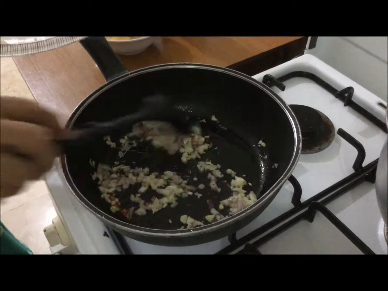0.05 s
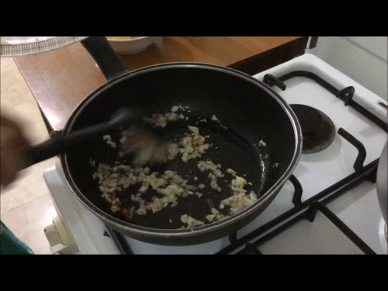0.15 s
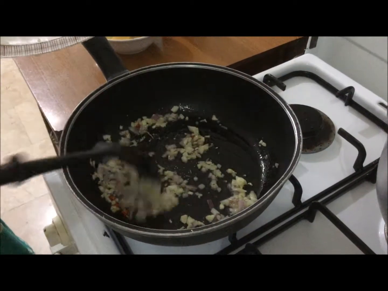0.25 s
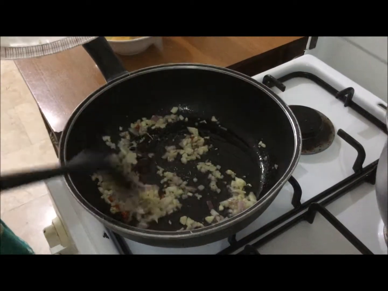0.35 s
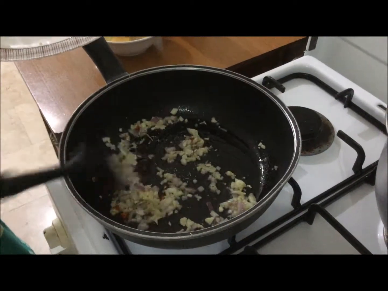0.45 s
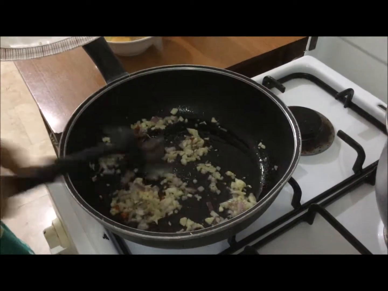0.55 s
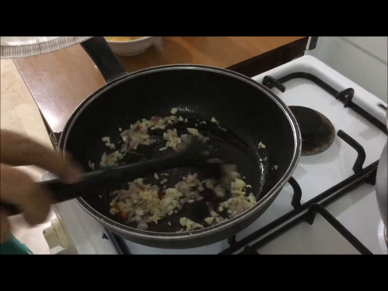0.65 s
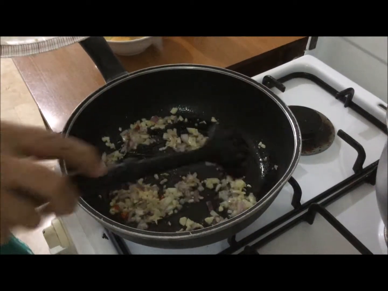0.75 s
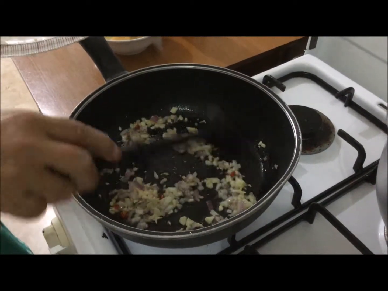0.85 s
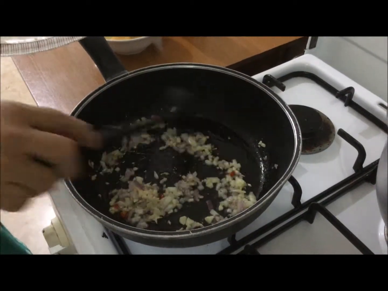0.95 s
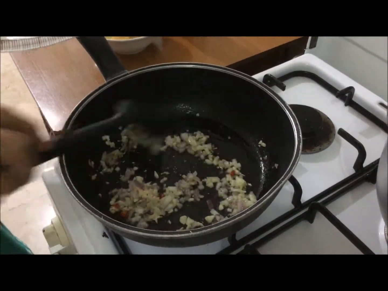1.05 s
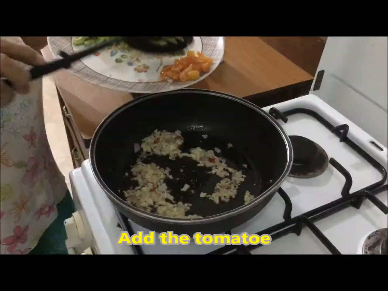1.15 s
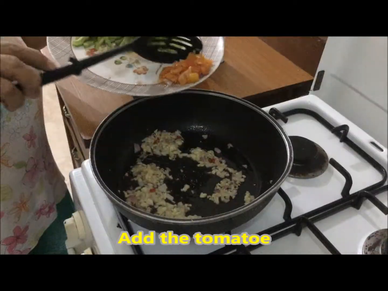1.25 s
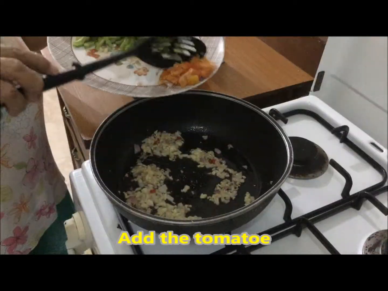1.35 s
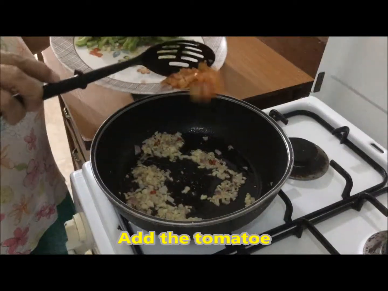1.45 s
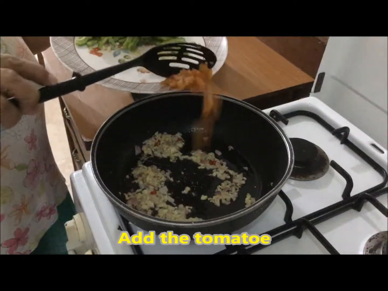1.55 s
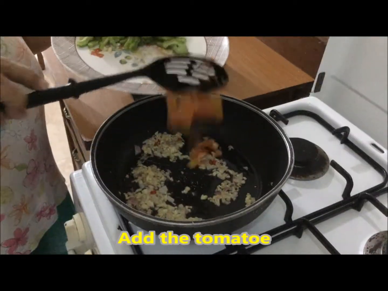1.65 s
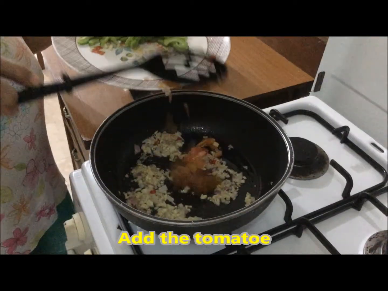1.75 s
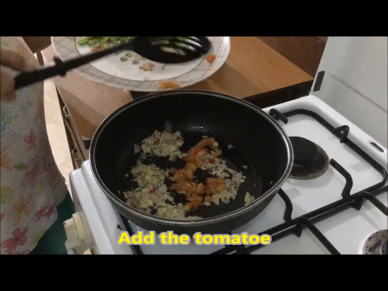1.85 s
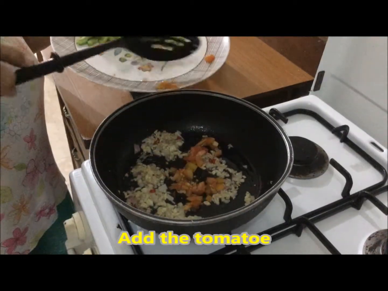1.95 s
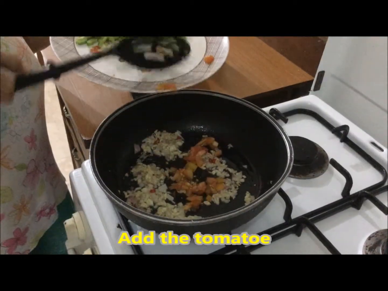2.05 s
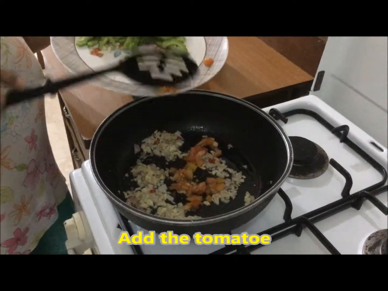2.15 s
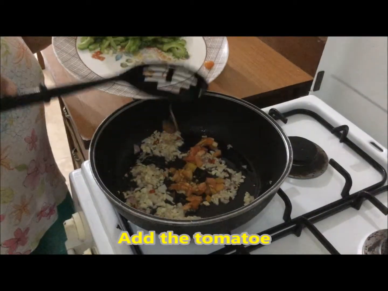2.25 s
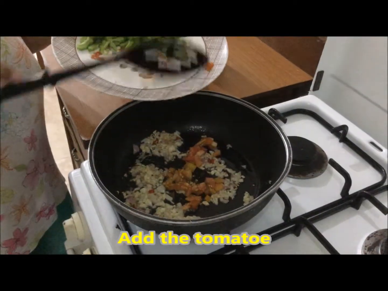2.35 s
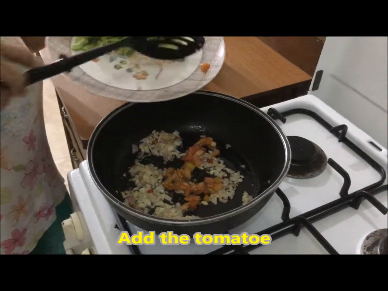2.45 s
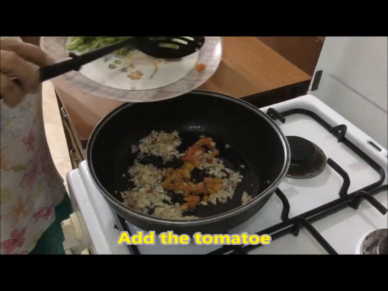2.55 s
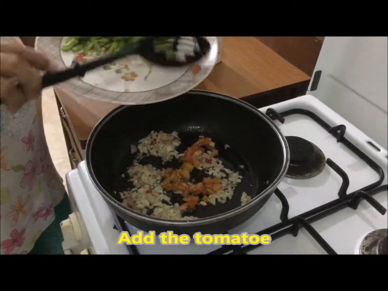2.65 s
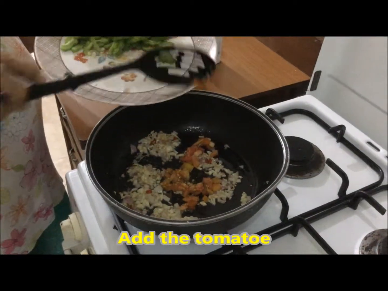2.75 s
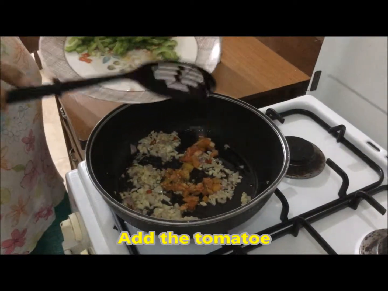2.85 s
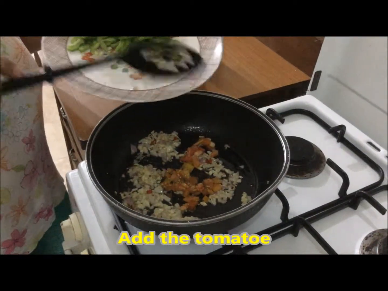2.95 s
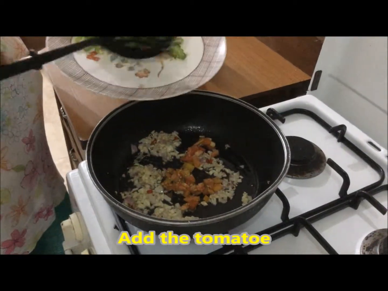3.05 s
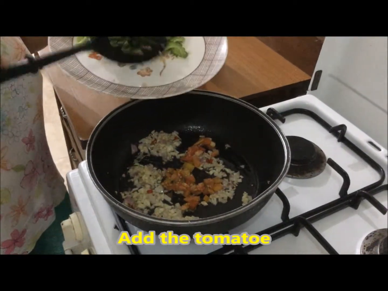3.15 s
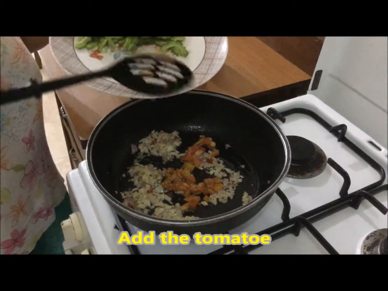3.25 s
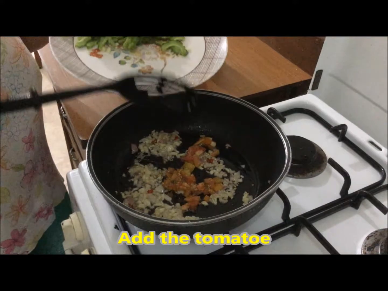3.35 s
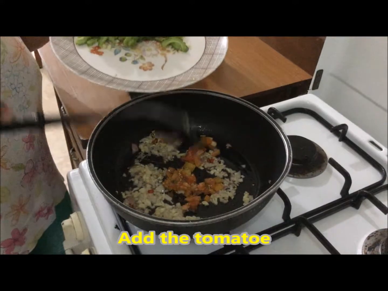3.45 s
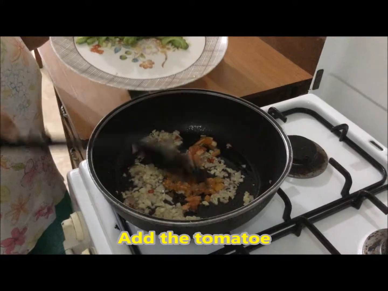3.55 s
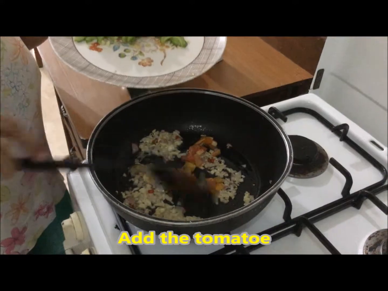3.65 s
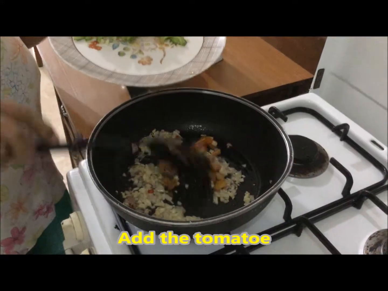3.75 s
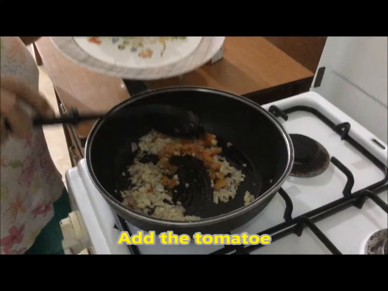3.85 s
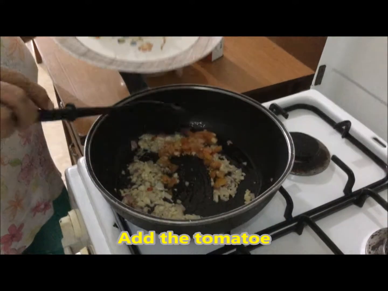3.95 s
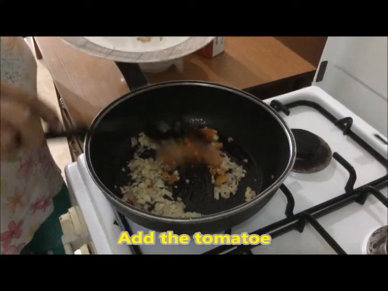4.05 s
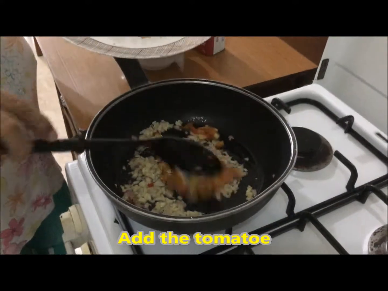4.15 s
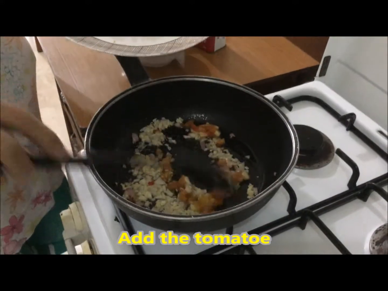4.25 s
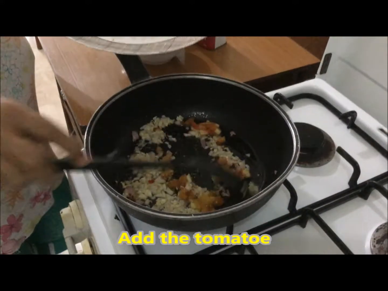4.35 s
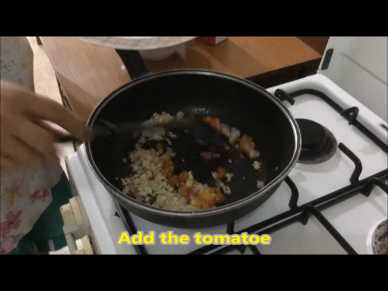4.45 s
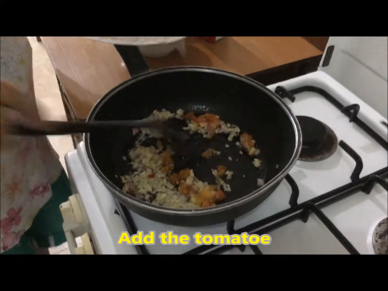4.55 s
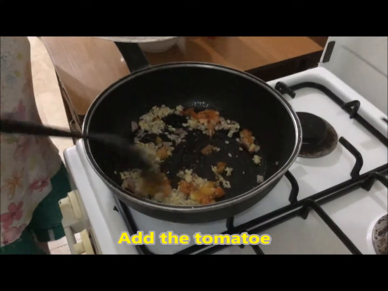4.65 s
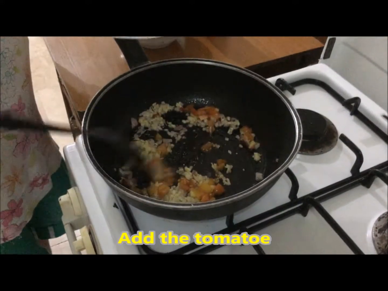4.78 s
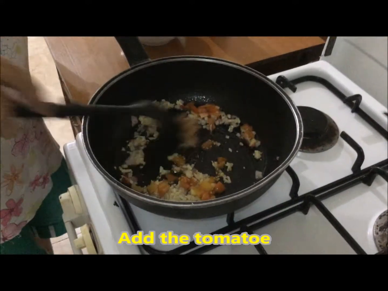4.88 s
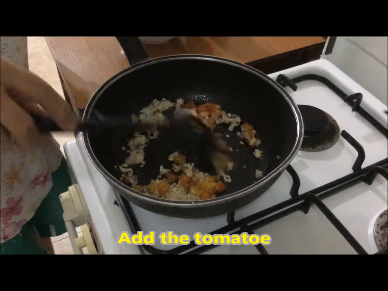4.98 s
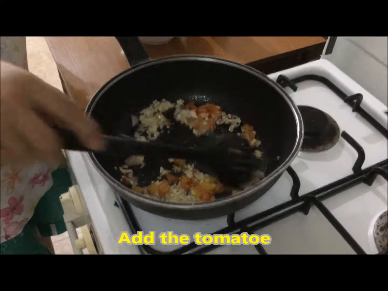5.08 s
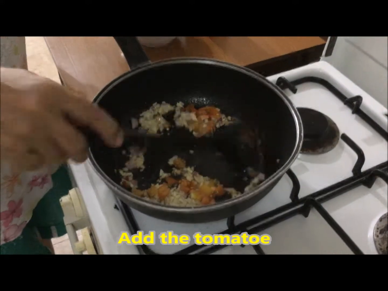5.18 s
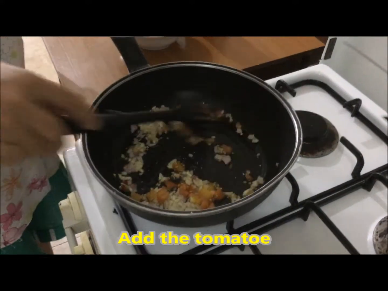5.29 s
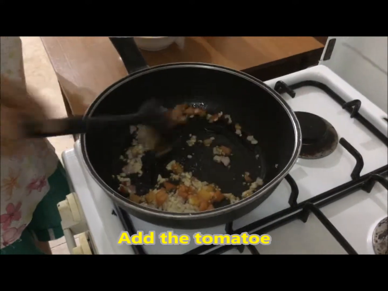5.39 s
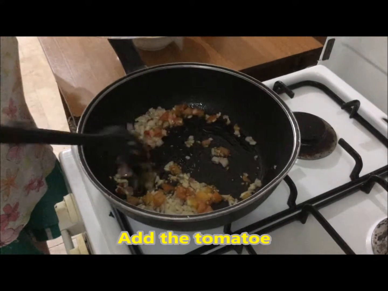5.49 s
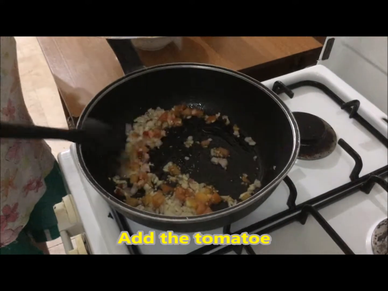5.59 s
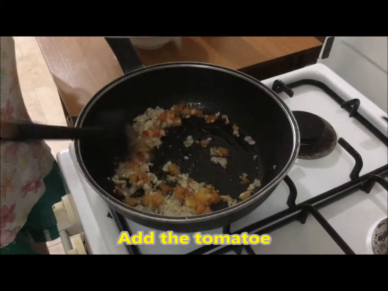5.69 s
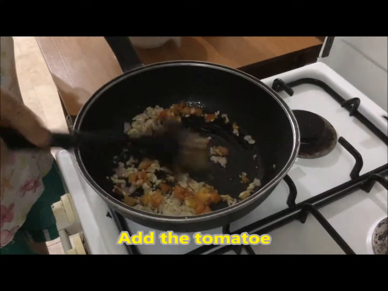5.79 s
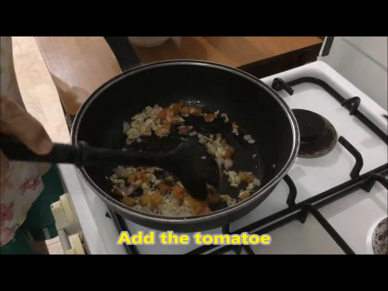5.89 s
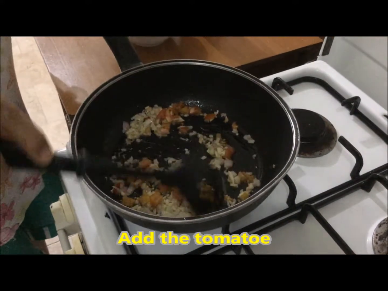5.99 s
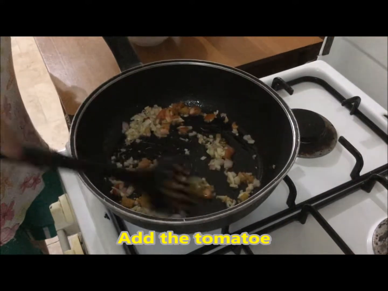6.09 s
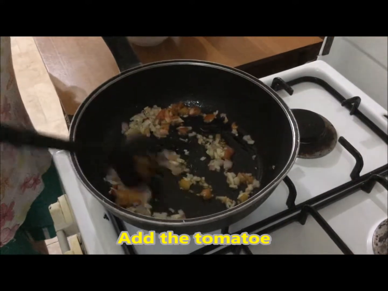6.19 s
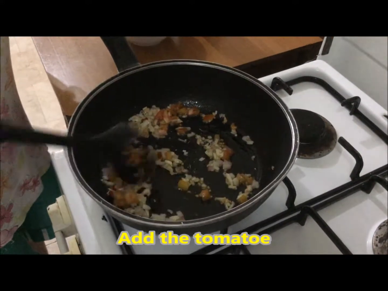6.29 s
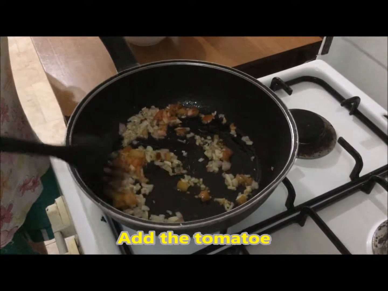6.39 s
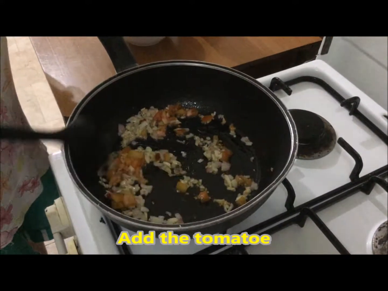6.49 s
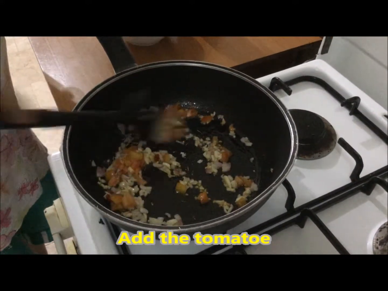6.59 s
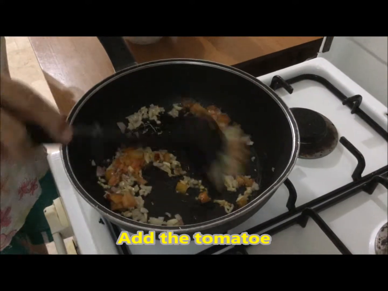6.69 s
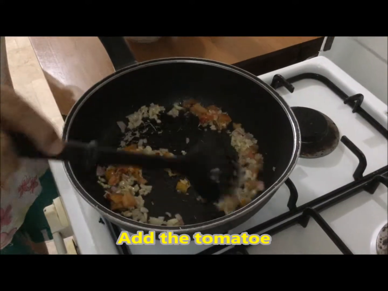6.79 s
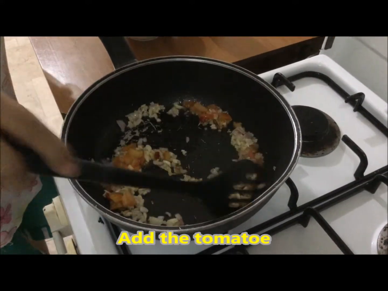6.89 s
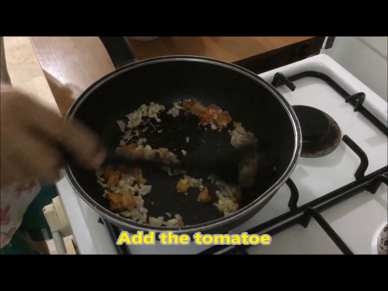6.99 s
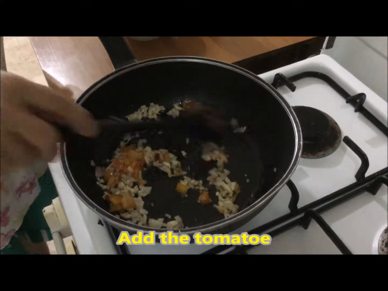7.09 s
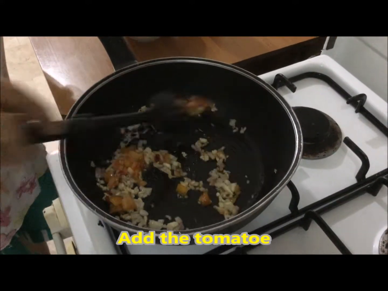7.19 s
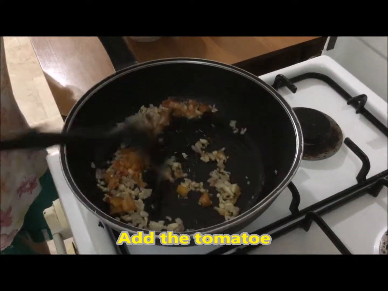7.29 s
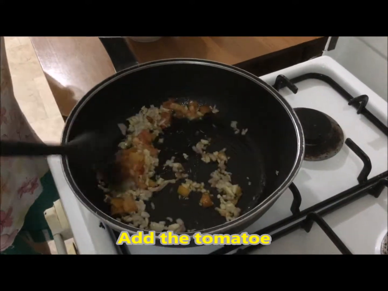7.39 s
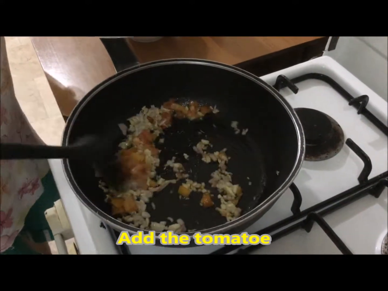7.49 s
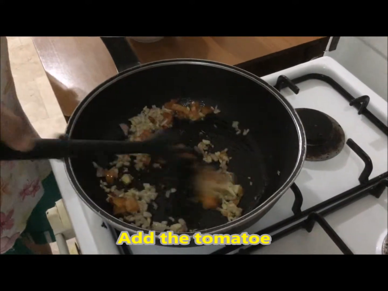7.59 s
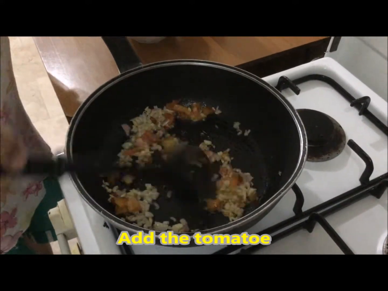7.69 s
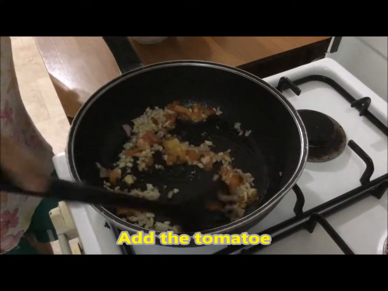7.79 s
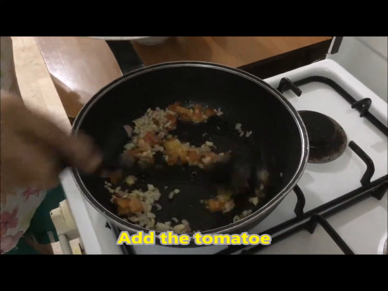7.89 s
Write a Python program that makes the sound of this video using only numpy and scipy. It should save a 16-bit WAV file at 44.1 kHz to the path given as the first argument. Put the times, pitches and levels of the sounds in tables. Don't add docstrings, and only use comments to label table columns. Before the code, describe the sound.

A close pan fry crackles brightly, cuts to a softer hiss, then grows juicier and louder with spoon scrapes, knocks and spitting drops.

```python
import sys
import numpy as np
from scipy import signal
from scipy.fft import rfft, irfft, next_fast_len
from scipy.io import wavfile
from scipy.ndimage import uniform_filter1d

SR = 44100
rng = np.random.default_rng(int(sys.argv[2]) if len(sys.argv) > 2 else 0)


def ratio_of_db(decibels):
    return 10 ** (np.asarray(decibels, float) / 20)


def store_pcm(level_fs):
    pcm = np.round(np.clip(level_fs, -1, 1) * 32767).astype(np.int16)
    wavfile.write(sys.argv[1], SR, np.atleast_2d(pcm).T)


N = 349713

# t/s, frying vigour level/dB, juice bubbling re vigour level/dB
FRY_STATES = [
    [(0.0, -39, -19.5), (0.958, -41, -19.5), (1.144, -42, -19.5)],
    [(1.184, -54, -14), (1.66, -53, -18), (1.83, -46.5, -20.5), (2.0, -43.5, -11), (2.6, -42.5, -9.5),
     (3.3, -40, -11), (3.9, -39, -12.5), (4.08, -35, -13), (4.5, -36.5, -12), (4.75, -33.5, -13.5),
     (5.1, -34.5, -12), (5.6, -34, -12.5), (6.6, -34, -12.5), (6.9, -31, -15), (7.93, -34, -14)],
]
# t/s, peak level/dB, low part level/dB
BIG_POPS = [(0.1231, -27, -33), (0.343, -19, -46), (0.4028, -22, -24), (0.3715, -26, -33),
            (0.6319, -22, -20), (0.8088, -21, -40), (1.6834, -29.5, -35), (1.7253, -38, -33),
            (2.0556, -27, -33), (2.1334, -33, -33), (2.2294, -32, -33), (2.2676, -29, -10),
            (2.9605, -30, -36), (3.219, -21, -28), (3.396, -22.5, -48), (3.4439, -29, -40),
            (3.5385, -26, -30), (3.6248, -28, -33), (3.6372, -26, -43), (3.6768, -29, -33),
            (3.7955, -24, -33), (3.89, -23, -34), (4.0898, -21, -36), (4.1076, -26, -40),
            (4.3154, -30, -22), (4.5725, -22, -24), (4.6818, -16, -27), (4.7675, -15.5, -30),
            (4.9038, -24, -35), (4.9735, -21, -28), (5.0408, -25, -36), (5.7922, -21, -42),
            (6.0886, -23, -36), (6.3782, -16.5, -20), (6.6039, -23, -33), (7.236, -20, -35),
            (7.2884, -22, -33), (7.5874, -19, -49), (7.8958, -20, -40)]
# t/s, peak level/dB, low part level/dB
SMALL_POPS = [(0.42, -32, -37), (0.483, -28, -28), (0.5004, -24, -24), (0.5112, -27, -38),
              (0.526, -23, -33), (0.608, -26, -33), (0.7474, -28.5, -21), (0.9567, -35, -32),
              (1.1185, -29, -32), (1.2841, -31, -31), (1.84, -36, -29), (1.8803, -32.5, -9),
              (1.9163, -36, -28), (1.9407, -35, -9), (1.9995, -33, -29), (2.0951, -32, -34),
              (2.4552, -26, -36), (2.4744, -28, -24), (2.4868, -35, -24), (2.5665, -31, -16),
              (2.6505, -46, -29), (2.7415, -30, -24), (2.7602, -35, -31), (2.8288, -30, -24),
              (2.8709, -28.5, -13), (2.8789, -37, -28), (2.937, -27, -26), (3.0012, -25, -34),
              (3.0527, -28, -27), (3.112, -38, -27), (3.1785, -26, -32), (3.2009, -27, -25),
              (3.232, -36, -31), (3.2715, -25, -16), (3.2804, -27, -38), (3.38, -33, -34),
              (3.4509, -25, -22), (3.55, -24, -27), (3.5569, -32, -35), (3.6506, -34, -34),
              (3.691, -25, -28), (3.732, -39, -28), (3.8423, -30, -32), (3.9917, -25, -21),
              (4.016, -22, -30), (4.0729, -28, -30), (4.102, -25, -38), (4.207, -24, -34),
              (4.4407, -20, -19), (4.5459, -35, -33), (4.6415, -30, -28), (4.8568, -27, -24),
              (5.0514, -31, -32), (5.9443, -27, -31), (6.1137, -25, -32), (6.4125, -27, -30),
              (7.047, -30, -29), (7.3293, -18, -23), (7.7025, -23, -38), (7.711, -24, -33)]
# t/s, peak level/dB, loudest
# mode f/Hz, thud level/dB
SPOON_KNOCKS = [(0.5098, -30, 950, -9), (0.749, -40, 1450, -11), (0.8968, -33.5, 873, -7),
                (0.8965, -38, 507, -6), (0.931, -48, 810, 1), (1.055, -41.5, 900, 6),
                (1.0963, -41, 1490, 11), (1.863, -46, 1030, -11), (1.278, -34.5, 796, -10),
                (2.114, -25, 1446, -7), (2.723, -28.5, 1530, -16), (2.968, -32, 1490, -24),
                (3.193, -24.5, 1380, -5), (3.747, -24.5, 2200, -10), (4.398, -23.5, 620, -23),
                (4.413, -25.5, 1060, 0.5), (4.822, -30.5, 740, -3), (5.728, -32, 1380, -5.5),
                (5.995, -46, 1480, 5), (6.483, -26.5, 1350, -4), (6.582, -30, 1430, -22),
                (7.101, -27.5, 594, -17), (7.118, -30, 1120, -9), (7.566, -47, 1350, 13)]
# t/s, peak level/dB, f/Hz
FLOOR_THUMPS = [(0.34, -49, 218), (0.507, -44, 171), (0.591, -45, 280), (0.634, -43, 310),
                (0.689, -49, 298), (0.896, -39, 240), (0.932, -34, 205), (0.93, -42, 101.6),
                (0.99, -41, 213), (1.058, -39, 232), (1.091, -44, 221), (1.183, -37.5, 298),
                (1.183, -48, 470), (1.274, -48, 302), (1.85, -41, 170), (1.9, -39.5, 190),
                (2.489, -46.5, 161), (3.1, -48, 192), (3.191, -49, 302), (3.75, -49, 260),
                (3.791, -38.5, 192), (4.412, -39, 300), (4.687, -48, 177), (4.83, -46, 310),
                (5.737, -43, 223), (5.999, -46.5, 400), (6.492, -34.5, 302), (6.582, -41, 246),
                (7.101, -41.5, 402), (7.568, -35.5, 230)]
# start t/s, length t/s, scrape level/dB, grate shake level/dB
SPOON_STROKES = [(0.0, 0.19, -58, -57), (0.568, 0.056, -54.5, -77), (0.897, 0.17, -53, -73),
                 (1.185, 0.15, -57, -71), (1.69, 0.39, -64.5, -58), (2.103, 0.086, -64, -68),
                 (2.498, 0.32, -63.5, -58), (2.897, 0.099, -67, -56), (3.19, 0.082, -56.5, -68),
                 (3.768, 0.085, -55.5, -50), (4.396, 0.061, -50, -50), (4.82, 0.093, -48, -52.5),
                 (5.236, 0.12, -58, -69), (5.742, 0.093, -54, -54), (6.103, 0.055, -50.5, -59),
                 (6.46, 0.18, -51.5, -63), (6.72, 0.046, -53.5, -56), (7.077, 0.15, -56.5, -57),
                 (7.542, 0.094, -51, -49.5), (7.872, .1, -52, -47)]
# t/s, peak level/dB, f/Hz
JUICE_SPITS = [(0.341, -52, 2410), (0.3406, -57, 1500), (0.7477, -45, 3200), (0.4503, -39, 2300),
               (1.892, -37, 3000), (1.1817, -58, 1750), (1.2763, -29, 1860), (1.2766, -29, 2740),
               (1.277, -40, 3540), (2.077, -33, 1430), (2.1032, -31, 1700), (2.1157, -22, 1380),
               (2.348, -25.5, 1390), (2.5294, -30, 1350), (2.9695, -23.5, 1530), (3.1958, -34, 1380),
               (3.732, -34, 1880), (3.748, -40, 2150), (4.352, -22, 1600), (4.7517, -26, 1280),
               (6.0884, -28, 1680), (6.221, -21, 1490), (6.3091, -23, 1350), (6.525, -29, 1980),
               (6.6167, -24, 1400), (7.809, -31, 1350)]
# t/s, peak level/dB, f/Hz
JUICE_DROPS = [(0.0193, -43, 1390), (0.0323, -45, 2000), (0.1282, -40, 1420), (0.1405, -35, 1600),
               (0.152, -35, 2500), (0.2331, -39, 1410), (0.2548, -44, 2510), (0.371, -50, 1320),
               (0.4285, -54, 2550), (1.094, -43, 1310), (1.295, -38, 1860), (1.8794, -44, 1840),
               (1.888, -37, 2470), (1.8984, -39, 1370), (1.975, -42, 1380), (2.031, -36, 1312),
               (2.0447, -33, 1440), (2.2328, -35, 1180), (2.2492, -36, 1390), (2.267, -43, 1320),
               (2.383, -36, 1440), (2.4513, -33, 1560), (2.64, -28.5, 1410), (2.722, -41, 1520),
               (3.2187, -27, 1370), (3.2686, -29, 1320), (3.488, -33, 1340), (3.517, -32, 1320),
               (3.5333, -35, 1330), (3.546, -27.5, 1270), (3.6779, -32, 1480), (3.6854, -31, 1570),
               (3.759, -27.5, 1950), (3.812, -35, 1340), (3.98, -31, 1720), (4.01, -27, 1570),
               (4.1593, -39, 1350), (4.24, -28, 1880), (4.3199, -33, 1360), (4.5672, -24.5, 1510),
               (4.8555, -27, 1700), (4.946, -34, 1570), (4.995, -37, 1650), (5.125, -42, 1500),
               (5.296, -28, 1360), (5.505, -33, 1320), (5.6364, -36, 1520), (5.6719, -39, 1350),
               (5.8847, -31, 1390), (5.9517, -23, 1550), (6.3684, -41, 1430), (6.82, -45, 1300),
               (7.119, -27, 2020), (7.2578, -24, 1450), (7.3847, -32, 1290), (7.6944, -31, 1450),
               (7.7325, -30, 1330), (7.8982, -29, 1530)]
# t/s, peak level/dB, f/Hz
SLOW_PLOPS = [(1.0542, -46, 565), (2.0307, -45, 660), (2.2324, -47, 665), (2.726, -51, 800),
              (2.938, -42, 640), (3.0472, -36, 726), (3.2107, -28, 840), (4.2142, -48, 640),
              (4.4336, -34, 600), (4.6595, -34, 610), (5.1795, -35, 656), (5.2144, -35, 684),
              (5.5639, -40, 620), (5.726, -33.5, 614), (6.0145, -32.5, 665), (6.1109, -36, 830),
              (6.907, -39, 760), (7.1266, -34, 584), (7.2352, -37, 700), (7.4198, -33.5, 650)]
# t/s, peak level/dB
FAT_SNAPS = [(0.2565, -38), (0.4295, -29), (0.5173, -38), (0.7489, -31), (1.0958, -35), (1.2766, -36),
             (1.2778, -35), (1.8894, -37), (1.9383, -40), (2.0816, -38), (2.2504, -35), (2.2692, -34),
             (0.6329, -34), (2.3346, -39), (2.5304, -36), (2.8595, -37), (2.9424, -39), (3.4961, -33),
             (3.814, -34), (3.8421, -30), (4.1593, -31), (4.6593, -30), (5.0893, -29), (6.0356, -33),
             (6.4139, -32)]
# t/s, level/dB
STREET_SWELL = [
    (0, -5.5),
    (1.15, -4.5),
    (1.2, 0.5),
    (2.4, 0),
    (3.5, -2),
    (3.8, -1.5),
    (7.93, 0.5),
]
# t/s, fully lost t/ms, all lost below f/Hz, spared lines f/Hz ...
LOST_FRAMES = [(0.089, 0.38, 11200, 120, 11000), (0.3175, 29, 9100, 5120, 9000),
               (0.729, 0.4, 11400, 4300, 10340), (0.923, 0.37, 13150, 835, 5690),
               (1.33, 0.2, 12290, 120, 12290), (1.673, 5, 13540, 1340, 1440, 5020),
               (1.797, 0.79, 10220, 119, 7560, 8490, 9810), (2.181, 2, 14400, 1230, 1970),
               (3.354, 2, 12700, 1430, 1840, 6110, 9390), (3.718, 0.81, 11400, 600, 4500, 6840, 7800),
               (3.78, 0.36, 13300, 1040, 1940, 3170, 7480),
               (4.505, 0.23, 13400, 120, 1276, 3130, 5875, 7135),
               (4.78, 4, 10200, 1370, 5650, 6380, 8870, 9765), (5.103, 0.5, 13300, 1354, 2130, 3720, 4740),
               (5.425, 0.35, 10700, 7950, 8270, 11300), (5.55, 0.23, 12200, 1290, 5420, 6740),
               (5.617, 0.49, 10800, 2945, 9310, 9700), (5.656, 0.37, 13600, 1370, 1950, 3130, 6320),
               (5.977, 0.6, 13000, 1320, 1980, 4190, 6350), (6.511, 0.22, 10300, 344, 10400),
               (6.553, 0.32, 10800, 1450, 8850), (6.703, 0.6, 11400, 1500, 2315, 8170),
               (7.64, 0.2, 12100, 120, 4490)]
# out t/s, in t/s, leftover level/dB, its fall in dB/s
SCENE_CHANGE = (1.1455, 1.1827, -19, -600)
# f/Hz, density level/dB per Hz
SIZZLE_SPECTRUM = [(1060, -37), (1800, -9.5), (2530, -13.5), (2790, -15.5), (3020, -11), (3550, -13),
                   (6240, -5.5), (7530, -4.5), (10200, -1), (13200, 2.5), (14300, 3), (15200, -8.5)]
# f/Hz, density level/dB per Hz
RUMBLE_SPECTRUM = [(13, -70), (22, -40), (70, -3.5), (113, -4.5), (145, -8.5), (200, -16.5), (260, -49),
                   (440, -120)]
# f/Hz, width f/Hz, level/dB
HOLLOW_MODES = [(1350, 303, 10.5), (1730, 225, 11.5), (1920, 1100, -5)]
# f/Hz, width f/Hz, level/dB
LOW_HOLLOW_MODES = [(598, 134, 5.5), (800, 990, -3.5)]
# f/Hz, width f/Hz, level/dB
FLOOR_MODES = [(173.3, 25.7, 6.5), (236, 22, 4), (310, 74, -1.5)]
# f/Hz, level/dB, t60 t/s
PAN_MODES = [(289, -6, 0.13), (500.4, -4.5, 0.021), (852, -9.5, 0.099), (1030, -11.5, 0.081),
             (1380, 3, 0.01), (2200, -19, 0.0076), (3400, -13, 0.013)]
# f/Hz, width f/Hz, level/dB
HUM_LINES = [(79, 5.7, 2.5), (117.8, 6.6, 1.5), (154.8, 3.5, -5), (171, 18, -40)]
# f/Hz, width f/Hz, level/dB
FRIDGE_WHINE = (474, 12, -76)

MIC_HZ, CUTOFF_HZ = 13300, 15290
WET_DB, MID_DB, MID_FOLLOWS = -11, -7.5, 0.37
LOW_SIMMER_DB, LOW_FOLLOWS = -4.5, 0.31
LOW_FLOOR_DB = -71.5
SURGE_DB, SURGE_PER_S = 0.25, 2.0
CRACKLES_PER_S, CRACKLE_DB = 60, -21.5
FULL_FRY_DB, LIVELY_DB = -36, -44
DIG_IN_S, LIFT_DB_PER_S, SHAKE_LAG_S = 0.012, 52, 0.04
IDLE_SCRAPE_DB, IDLE_FOLLOWS, ROOM_DB = -62.5, 0.54, -57
DROP_CYCLES = 15.0
POP_HZ, POP_SPREAD, DULL_HZ_PER_DB = 11870, 0.058, 30
SNAP_HZ, SNAP_T60_S = 3300, 0.0025
CRACK_DB, CRACK_T60_S = 5, 0.005
EARLY_S = 2
STEP_DB, BLIP_MS, EARLY_MS = 15, 46.0, 8.0


def unit(x):
    return x / np.sqrt(np.mean(x ** 2) + 1e-20)


def curves(spans):
    s, *columns = np.transpose(np.concatenate(spans))
    return [np.interp(np.arange(N) / SR, s, c) for c in columns]


def drift(rate_hz):
    r = np.exp(-40 * np.pi * rate_hz / SR)
    slow = signal.lfilter([1], [1, -2 * r, r * r], rng.standard_normal(N // 20 + 3002))[3000:]
    return np.interp(np.arange(N) / 20, np.arange(len(slow)), unit(slow))


def grains(per_s, spread_db, rarest=3):
    rarity = np.minimum(rng.exponential(1, N), rarest)
    sizes = ratio_of_db(spread_db * rarity) * rng.choice([-1, 1], N)
    return sizes * (rng.random(N) < per_s / SR) + 1e-18


def resonate(x, peaks):
    out = 0
    for k, (hz, width_hz, db) in enumerate(peaks):
        r = np.exp(-np.pi * width_hz / SR)
        a = [1, -2 * r * np.cos(2 * np.pi * hz / SR), r * r]
        out = out + (-1) ** k * ratio_of_db(db) * signal.lfilter([(1 - r * r) / 2, 0, (r * r - 1) / 2], a, x)
    return unit(out)


def tone(hz, t60_s, size=4000):
    t = np.arange(size) / SR
    return np.sin(2 * np.pi * hz * t) * ratio_of_db(-60 * t / t60_s)


def shape(x, spectrum):
    hz, db = np.transpose(spectrum)
    size = next_fast_len(N)
    log_hz = np.log(np.arange(size // 2 + 1) * SR / size + 1)
    gain = ratio_of_db(np.interp(log_hz, np.log(hz), db))
    return unit(irfft(rfft(x, size) * gain, size)[:N])


def patchy(sources, low_hz, high_hz, count, patch_db, shared_db):
    out, shared, edges = 0, drift(24.0), np.geomspace(low_hz, high_hz, count + 1)
    for k, (low, high) in enumerate(zip(edges, edges[1:])):
        sos = signal.butter(2, [low, high], "band", fs=SR, output="sos")
        band = signal.sosfilt(sos, sources[k % len(sources)])
        out = out + ratio_of_db(patch_db * drift(18.4) + shared_db * shared) * band
    return out


def sizzle(level_db, mid_db):
    bursts = grains(2600 * ratio_of_db(4.0 * drift(60.0)), spread_db=5.2)
    pitches_hz, dealt = np.geomspace(2200, 15000, 12), rng.integers(0, 12, N)
    rings = 0
    for k, hz in enumerate(pitches_hz):
        rings = rings + resonate(bursts * (dealt == k), [(hz, hz * 0.42, 0)]) * np.sqrt(hz)
    blur = patchy(rng.standard_normal((2, N)), 1022, 16650, count=13, patch_db=1.5, shared_db=1.18)
    fizz = shape(unit(rings) + ratio_of_db(4.5) * unit(blur), SIZZLE_SPECTRUM)
    mid = signal.sosfilt(signal.butter(2, 5000, fs=SR, output="sos"), fizz)
    mid_gain = ratio_of_db(mid_db + 14.0 + 1.64 * drift(7.9))
    return ratio_of_db(level_db - 0.51) * (fizz - mid + mid_gain * mid)


def simmer(high_db, low_db):
    quick = unit(grains(300 * ratio_of_db(2 * drift(12)), spread_db=4.5, rarest=1.8))
    quick = quick + ratio_of_db(-1) * rng.standard_normal(N)
    slow = unit(grains(300, spread_db=1.5)) + ratio_of_db(-4.5) * rng.standard_normal(N)
    broad = resonate(resonate(quick, [(1700, 2100, 0)]), [(1600, 2500, 0)])
    high = unit(resonate(quick, HOLLOW_MODES) + ratio_of_db(-7.0) * broad)
    return ratio_of_db(high_db + 1.0) * high + ratio_of_db(low_db - 2.5) * resonate(slow, LOW_HOLLOW_MODES)


def crackle(level_db):
    per_s = CRACKLES_PER_S * ratio_of_db(np.minimum(level_db - LIVELY_DB, 0))
    clicks, dealt = grains(per_s, spread_db=2.6, rarest=1.2), rng.integers(0, 4, N)
    # f/Hz, width f/Hz, level/dB
    colours = [(3260, 1400, -15), (6300, 4500, -15.0), (8700, 3000, 5.5), (12600, 7600, 8.5)]
    out = 0
    for k, (hz, width_hz, db) in enumerate(colours):
        out = out + ratio_of_db(db) * resonate(clicks * (dealt == k), [(hz, width_hz, 0)])
    return ratio_of_db(CRACKLE_DB + np.minimum(level_db, FULL_FRY_DB)) * out


def strokes(column, lag_s, idle_db):
    t, power = np.arange(N) / SR - lag_s, ratio_of_db(2 * idle_db)
    for row in SPOON_STROKES:
        s, length_s = row[:2]
        rise = np.clip((t - s) / DIG_IN_S + 1, 0, 1)
        lift_db = LIFT_DB_PER_S * np.maximum(t - s - length_s, 0)
        power = power + (rise * ratio_of_db(row[column] - lift_db)) ** 2
    return 10 * np.log10(power)


def scrape(level_db):
    slips = unit(grains(120, spread_db=3.5)) + ratio_of_db(-1.5) * rng.standard_normal(N)
    return ratio_of_db(level_db - 4.0) * resonate(resonate(slips, FLOOR_MODES), [(240, 960, 0)])


def kitchen(level_db):
    noise = rng.standard_normal((3, N))
    rumble = patchy(noise[:2], 19.5, 438, count=9, patch_db=1.5, shared_db=-2.5)
    modes = resonate(resonate(noise[2], HUM_LINES), [(112, 610, 0)])
    boom = unit(shape(rumble, RUMBLE_SPECTRUM) + ratio_of_db(-3.5) * modes)
    hz, width_hz, whine_db = FRIDGE_WHINE
    whine = resonate(resonate(noise[2], [(hz, width_hz, 0)]), [(hz, width_hz, 0)])
    return ratio_of_db(level_db - 1.5) * boom + ratio_of_db(whine_db) * whine


def spits():
    out, bursts = np.zeros(N + 2000), JUICE_SPITS + JUICE_DROPS + SLOW_PLOPS
    fade = ratio_of_db(-60 * np.arange(2000) / SR / 0.011)
    for (s, db, hz), noise in zip(bursts, rng.standard_normal((len(bursts), 2000))):
        click = uniform_filter1d(noise, size=4) * fade
        ring = tone(hz, DROP_CYCLES / hz, size=2000)
        at = round((s + 0.0008) * SR)
        out[at:at + 2000] += ratio_of_db(db - 3.5) * (ring + 0.33 * click * hz / 1400)
    return out[:N]


def pops():
    out, t = np.zeros(N + 400), np.arange(400) / SR
    puff = signal.butter(1, [1300, 5500], "band", fs=SR)
    swell = t / 0.0002 * np.exp(1 - t / 0.0002)
    bursts = BIG_POPS + SMALL_POPS
    for (s, db, low_db), noise in zip(bursts, rng.standard_normal((len(bursts), 400))):
        hz = (POP_HZ - DULL_HZ_PER_DB * (low_db + 34)) * (1 + POP_SPREAD * noise[-1])
        body = np.sin(2 * np.pi * hz * t)
        mic = 0.74 * np.sin(2 * np.pi * MIC_HZ * t)
        burst = (body + mic + 0.3 * np.diff(noise, prepend=0)) * swell
        burst = burst + ratio_of_db(low_db + 15) * signal.lfilter(*puff, noise * swell)
        burst[45:] += 0.25 * burst[:-45]
        at = round((s + 0.001) * SR)
        out[at:at + 400] += ratio_of_db(db - 1) * burst
    return signal.sosfilt(signal.butter(2, 1500, "high", fs=SR, output="sos"), out[:N])


def snaps():
    clicks = np.zeros(N)
    s, db = np.transpose(FAT_SNAPS)
    clicks[np.round(s * SR).astype(int) - 8] = ratio_of_db(db + 4)
    return signal.fftconvolve(clicks, tone(SNAP_HZ, SNAP_T60_S, size=200))[:N]


def thumps():
    out, rise = np.zeros(N + 4000), 1 - np.exp(-np.arange(4000) / 110.0)
    for s, db, hz in FLOOR_THUMPS:
        at = round(s * SR)
        boom = tone(hz, 0.18) + 0.08 * tone(hz * 0.99, 0.54)
        out[at:at + 4000] += ratio_of_db(db - 4.5) * rise * boom
    return out[:N]


def knocks():
    out = np.zeros(N + 4000)
    band = signal.butter(1, [500, 5000], "band", fs=SR)
    fade = ratio_of_db(-60 * np.arange(4000) / SR / 0.03)
    rise = 1 - np.exp(-np.arange(4000) / 20)
    draws = rng.standard_normal((len(SPOON_KNOCKS), 4000))
    for (s, db, hz, thud_db), chance in zip(SPOON_KNOCKS, draws):
        blow = 0.6 * tone(hz, 0.055) + ratio_of_db(3) * fade * signal.lfilter(*band, chance)
        blow += ratio_of_db(CRACK_DB) * signal.lfilter(*band, tone(hz, CRACK_T60_S))
        for (mode_hz, mode_db, t60_s), c in zip(PAN_MODES, chance):
            weight_db = thud_db if mode_hz < 500 else -2.5 * abs(np.log2(mode_hz / hz))
            blow += ratio_of_db(mode_db + weight_db + 1.5 * c) * tone(mode_hz * (1 + 0.035 * c), t60_s)
        at = round(s * SR)
        out[at:at + 4000] += ratio_of_db(db - 7.5) * blow * rise
    return out[:N]


def scene():
    vigour_db, juice_db = curves(FRY_STATES)
    sizzle_db, wet_db = vigour_db + SURGE_DB * drift(SURGE_PER_S), juice_db - WET_DB
    simmer_db = vigour_db + juice_db
    slow_db = simmer_db + LOW_SIMMER_DB + LOW_FOLLOWS * wet_db
    low_db = 10 * np.log10(ratio_of_db(2 * slow_db) + ratio_of_db(2 * LOW_FLOOR_DB))
    fry = sizzle(sizzle_db, MID_DB + MID_FOLLOWS * wet_db) + simmer(simmer_db, low_db)
    fry = fry + crackle(sizzle_db)
    idle_db = IDLE_SCRAPE_DB + IDLE_FOLLOWS * (vigour_db + 40)
    drag = scrape(strokes(column=2, lag_s=0, idle_db=idle_db))
    street_db = curves([STREET_SWELL])[0]
    room = kitchen(strokes(column=3, lag_s=SHAKE_LAG_S, idle_db=ROOM_DB + street_db))
    mix = fry + drag + room + spits() + pops() + snaps() + thumps() + knocks()
    return np.tile(mix, (2, 1))


def thin(x, contrast=0.46):
    _, _, z = signal.stft(x, nperseg=1024)
    size = abs(z) + 1e-12
    usual = uniform_filter1d(size, size=25, axis=0)
    strength = contrast * rng.exponential(1, z.shape[1]).clip(0, 2.2)
    sharp = BIG_POPS + SPOON_KNOCKS + JUICE_SPITS + FAT_SNAPS
    attacks = np.round([row[0] * SR / 512 for row in sharp]).astype(int)
    for near in (-1, 0, 1):
        strength[attacks + near] *= 0.15
    small = np.round([row[0] * SR / 512 for row in SMALL_POPS + JUICE_DROPS]).astype(int)
    strength[small] *= 0.4
    above_bass = np.arange(len(z))[:, None] * SR / 1024 > 400
    z = z * (size / usual / 1.69) ** (strength * above_bass)
    return signal.istft(z, nperseg=1024)[1][:N]


def gut_frames(x):
    out, size = x.copy(), 2048
    hz = np.arange(size // 2 + 1) * SR / size
    offset_ms = (np.arange(size) - size / 2) * 1000 / SR
    for s, lost_ms, top_hz, *lines_hz in LOST_FRAMES:
        edge_ms = max(5, 14 - lost_ms)
        window = np.cos(np.pi / 2 * np.clip((abs(offset_ms) - lost_ms / 2) / edge_ms, 0, 1))
        frame = slice(round(s * SR) - size // 2, round(s * SR) + size // 2)
        bins = rfft(window * out[frame])
        local = uniform_filter1d(abs(bins), size=5)
        kept = 1.3 * (hz > top_hz) * (local > 1.02 * uniform_filter1d(local, size=61))
        kept = np.maximum(kept, ratio_of_db(-17 - 1.2 * lost_ms) + (hz < 300 - 40 * lost_ms))
        usual = uniform_filter1d(local, size=31)
        kept = np.maximum(kept, 1.6 * (hz > 400) * (abs(bins) > (4 + lost_ms / 8) * usual))
        kept = np.maximum(kept, hz < 400 - min(lines_hz))
        out[frame] -= window * irfft(bins * (1 - kept))

        early = s < EARLY_S
        t_ms = offset_ms + min(2 * lost_ms, EARLY_MS) * early
        blip_db = STEP_DB + min(lost_ms, 5) * (1.9 if early else 0.2) + (-2 if early else 1)
        swell = np.cos(np.pi * np.clip(t_ms / BLIP_MS, -0.5, 0.5)) ** 2
        swell = swell * ratio_of_db(blip_db) * 2 / window.sum()
        around = uniform_filter1d(local, size=121)
        for line_hz in lines_hz:
            level = (line_hz > 400) * around[round(line_hz * size / SR)]
            out[frame] += level * swell * np.sin(2 * np.pi * line_hz * t_ms / 1000)
    return out


def roll_off(x):
    return signal.sosfilt(signal.butter(12, 15820, fs=SR, output="sos"), x)


def record(dry):
    t = np.arange(N) / SR
    out_s, in_s, left_db, fall_db_per_s = SCENE_CHANGE
    gap = (t > out_s) & (t < in_s)
    gain = np.where(gap, ratio_of_db(left_db + fall_db_per_s * (t - out_s)), 1)
    edge = signal.ellip(12, 0.3, 60, CUTOFF_HZ, fs=SR, output="sos")
    mono = signal.sosfilt(edge, gain * gut_frames(thin(dry[0])))
    return roll_off(np.tile(mono, (2, 1)))


dry = scene()
out = record(dry)
store_pcm(out)
```